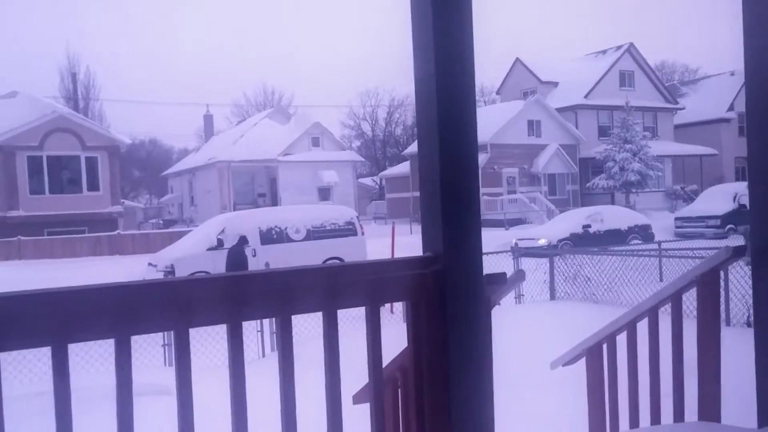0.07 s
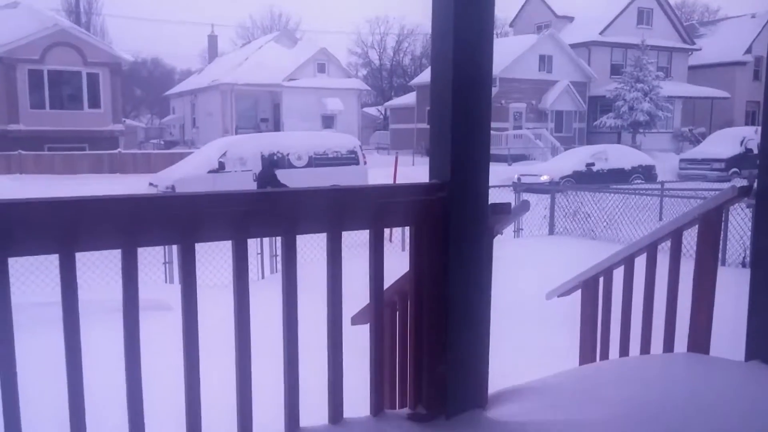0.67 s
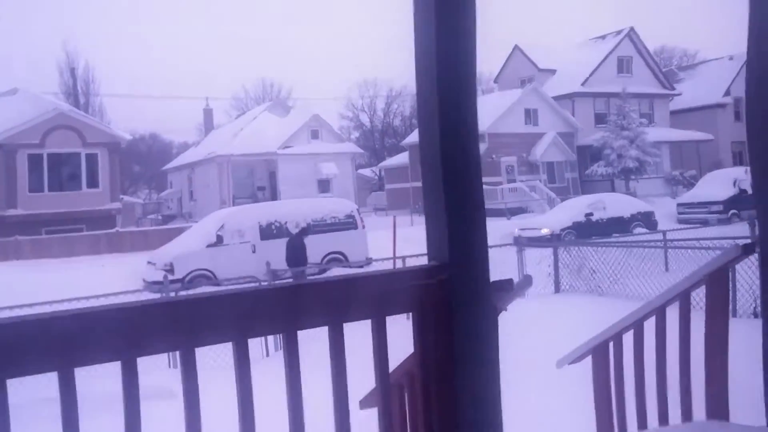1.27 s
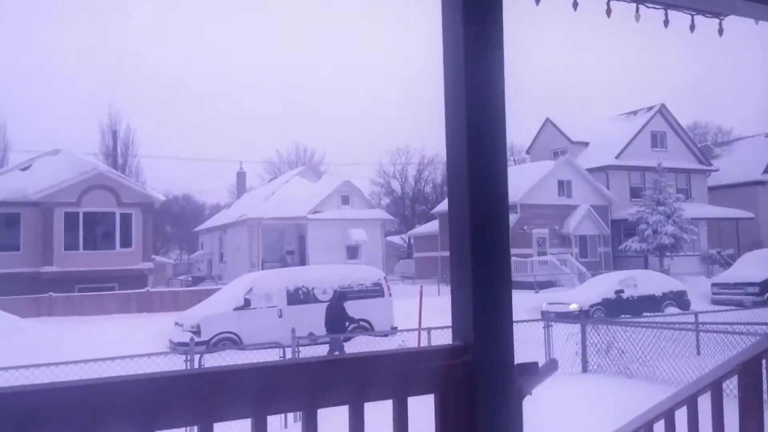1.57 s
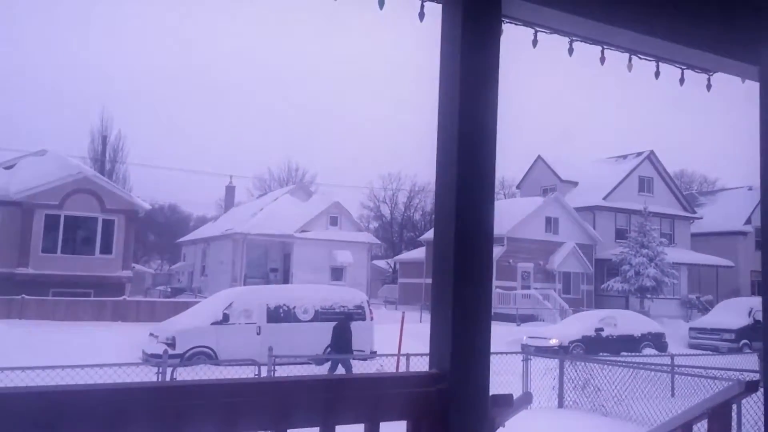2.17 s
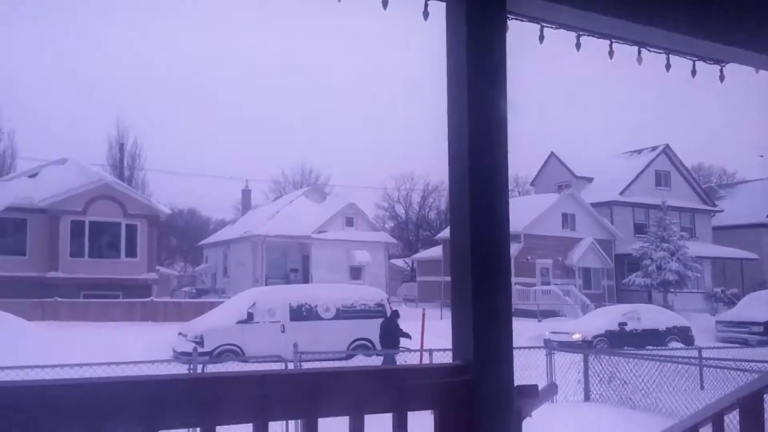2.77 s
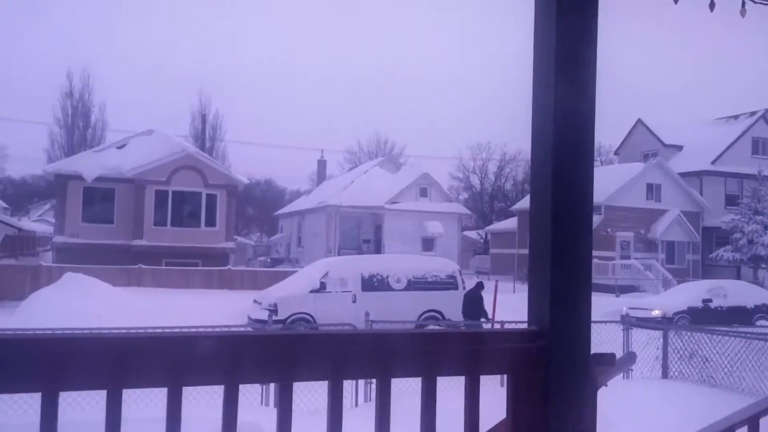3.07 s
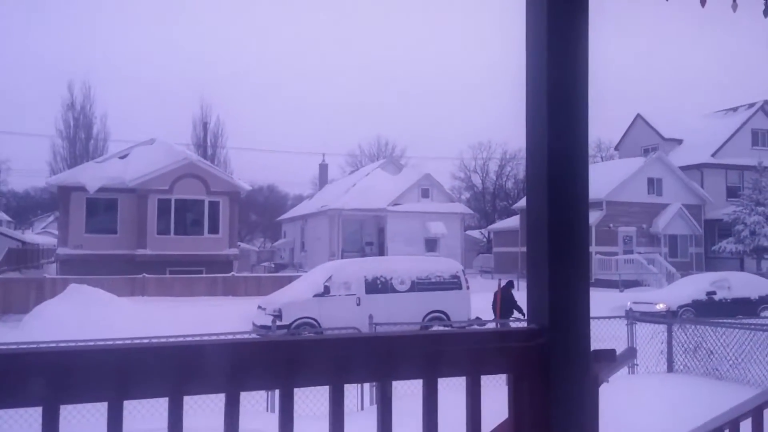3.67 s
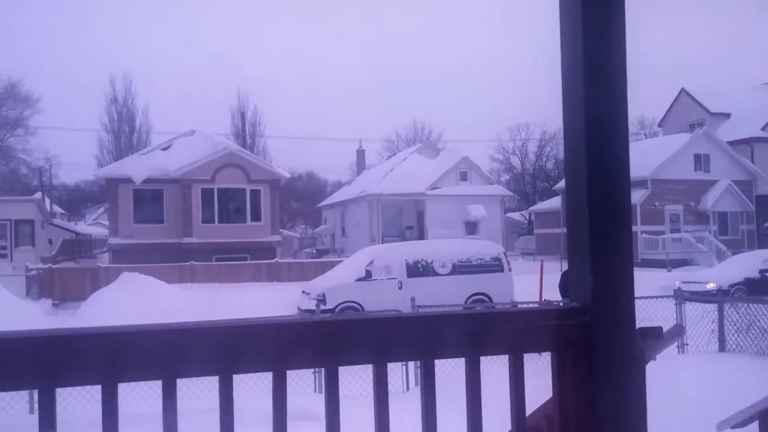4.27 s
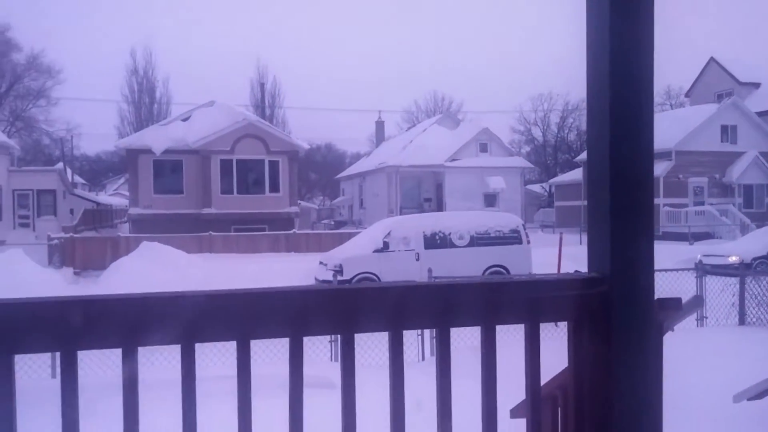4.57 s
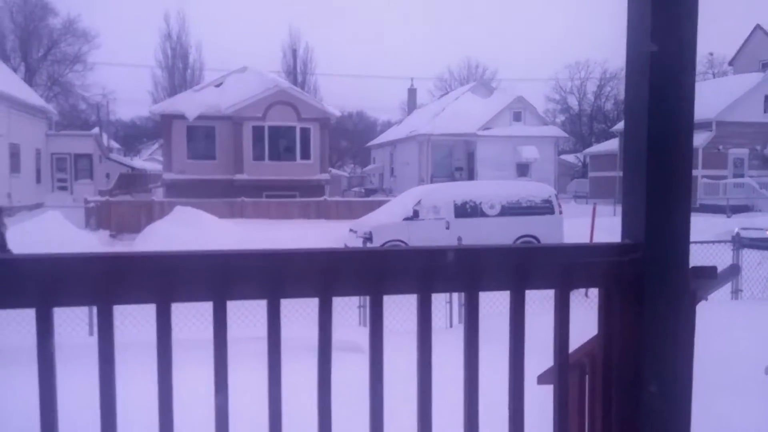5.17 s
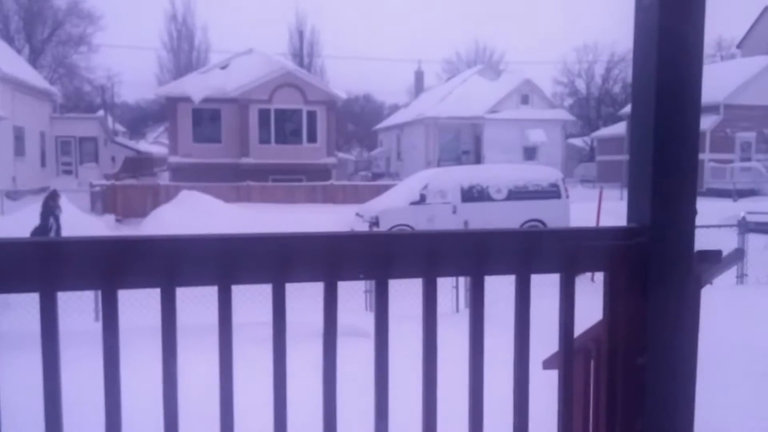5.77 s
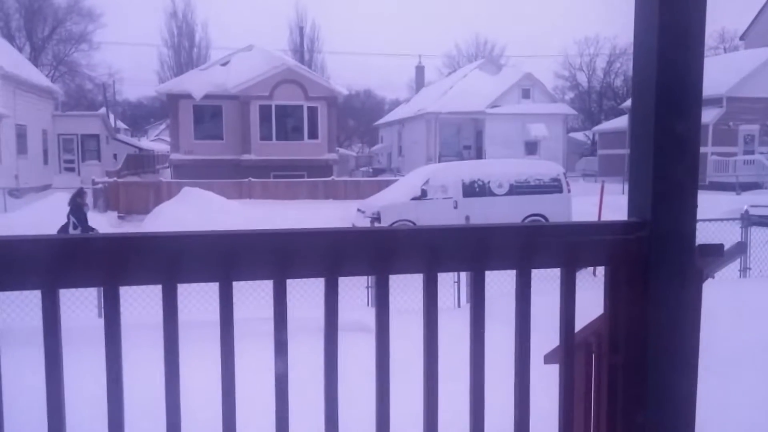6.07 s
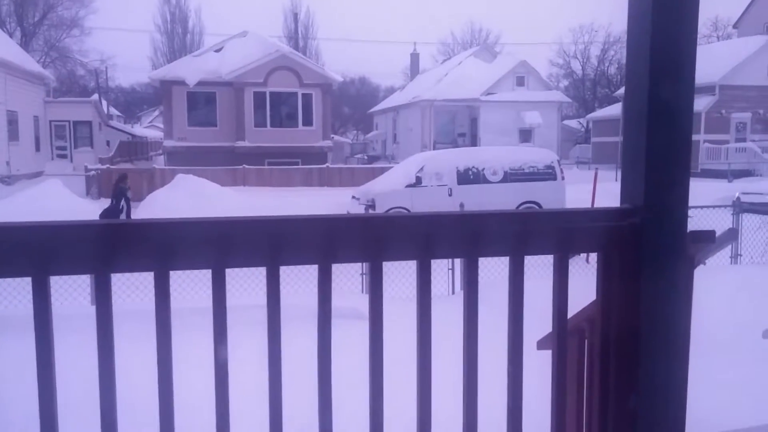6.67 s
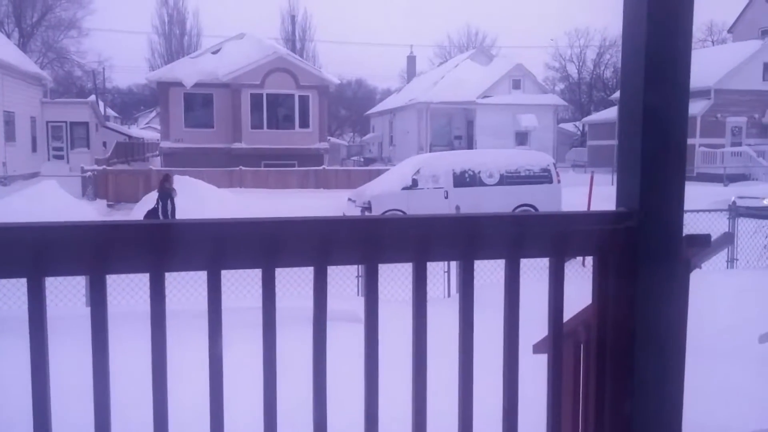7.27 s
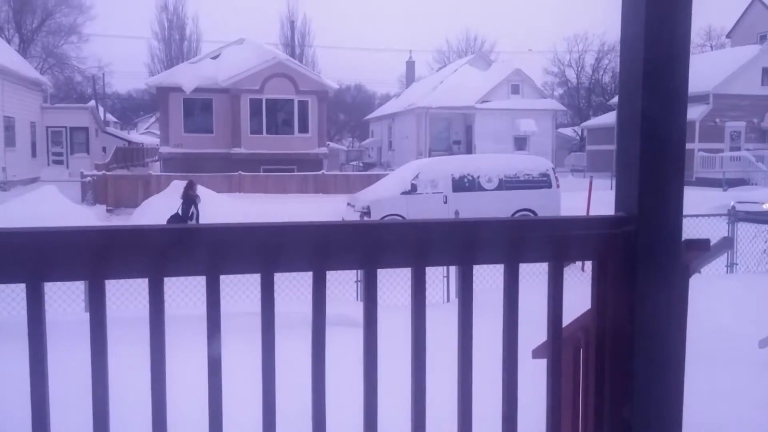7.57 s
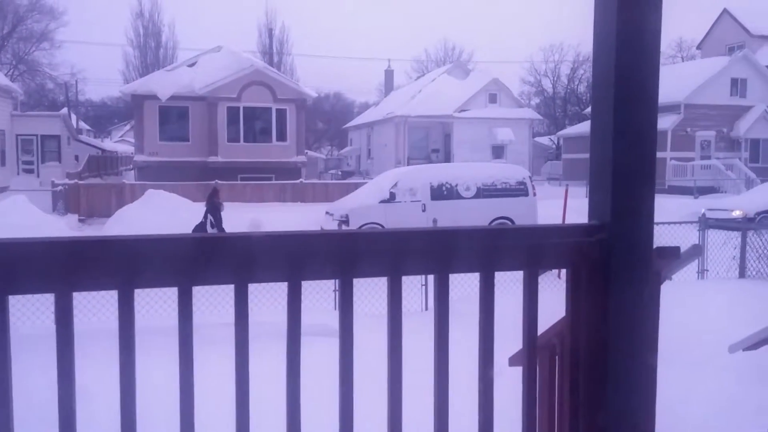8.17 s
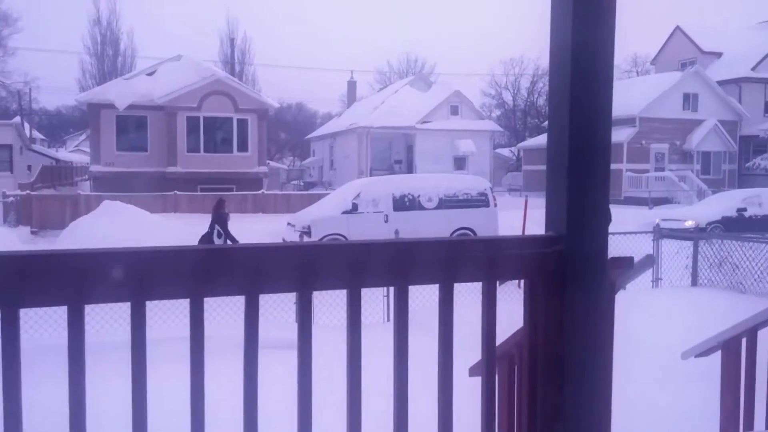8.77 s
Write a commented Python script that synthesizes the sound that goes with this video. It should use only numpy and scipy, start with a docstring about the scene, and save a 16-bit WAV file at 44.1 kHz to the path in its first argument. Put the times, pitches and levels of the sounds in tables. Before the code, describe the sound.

Faint wavering wind whistles over a low rumble, with one sharp, close bump and scrape of a hand on the microphone.

```python
"""Wind whistles through a narrow gap over a low rumble: a snowy street, from a porch, on a hand-held camera.
The whistle turns higher and hissier in the gusts, and the two strongest add a hollow hoot.
Right at the microphone a hand bumps and scrapes the camera, whose gain control then ducks
for a few seconds. Later, fingers tap the case."""
import sys
import numpy as np
from scipy import signal
from scipy.fft import irfft, next_fast_len
from scipy.io import wavfile

SR = 44100
rng = np.random.default_rng(int(sys.argv[2]) if len(sys.argv) > 2 else 0)


def store_wav(level_fs):
    """Save 16-bit WAV to argv[1]."""
    pcm = np.round(np.clip(np.atleast_2d(level_fs), -1, 1) * 32767)
    wavfile.write(sys.argv[1], SR, pcm.T.astype(np.int16))


N = 389403
T = np.arange(N) / SR


def whistle(gap_hz=3550, spacing_hz=700, lock=0.42, hiss_db=-7.0, hiss_width_hz=450, gain_db=-0.73):
    """An edge tone: eddies shake the jet, which clings to one resonance of the gap, then jumps on."""
    # how loudly the gap answers each pitch of the jet: pitch_hz, level_db
    gap_response = [(2200, -77), (2550, -74.5), (2850, -82.5), (3050, -79), (3200, -72), (3400, -68),
                    (3600, -67), (3850, -64.5), (4100, -70), (4450, -70.5), (4950, -74), (5400, -70),
                    (5900, -67.5)]
    waver_hz, flutter_hz = 95, 130
    saturation_db, break_db = 2, 7
    aim_hz = jet()
    jet_hz = aim_hz + waver_hz * aim_hz / gap_hz * walk(55)  # a faster jet is shaken harder
    level_db = np.interp(jet_hz, *np.transpose(gap_response))
    detune = 2 * np.pi * (jet_hz - gap_hz) / spacing_hz
    pull_hz = lock * np.sin(detune) * spacing_hz / (2 * np.pi)
    pitch_hz = jet_hz - pull_hz + flutter_hz * walk(240)
    phase = 2 * np.pi * np.cumsum(pitch_hz) / SR
    # the tone saturates when the jet is on the edge, and breaks up when an eddy knocks it off
    miss = np.maximum(walk(45), 0)
    tone = unit(np.sin(phase) * undb(saturation_db * np.cos(detune) - break_db * miss))
    # a faster jet is more turbulent and wraps the tone in a band of hiss
    hiss = walk(hiss_width_hz) * np.sin(phase) + walk(hiss_width_hz) * np.cos(phase)
    return unit(tone + hiss * undb(hiss_db) * aim_hz / gap_hz) * undb(level_db + gain_db)


def jet(catch_s=0.027):
    """Pitch of the air jet in Hz: it idles low, and each spell or chirp lifts it to where the gap sings."""
    # the weak jet between spells: time_s, pitch_hz
    lull = [(2.0, 2850), (6.75, 2499), (7.8, 2520), (7.95, 3020), (8.8, 2980)]
    # spells of whistling, one curve each: time_s, pitch_hz
    spells = [
        [(0.03, 3500), (0.082, 4430), (0.132, 4080), (0.148, 5274), (0.356, 4550), (0.404, 3676), (0.574, 4404),
         (0.588, 5208), (0.61, 4299), (0.806, 4512), (0.858, 3676), (0.902, 4922), (0.908, 4151), (0.956, 4779),
         (1.022, 3314), (1.15, 3580)],
        [(1.42, 3524), (1.44, 4315), (1.484, 3707), (1.584, 3508), (1.61, 4563), (1.652, 3626), (1.87, 3367),
         (1.938, 3780), (1.96, 3252)],
        [(2.63, 3272), (2.668, 3690), (2.762, 3530), (2.78, 4245), (2.824, 4957), (2.98, 4980), (3.014, 3845),
         (3.084, 3834), (3.102, 4813), (3.318, 3494), (3.344, 3102), (3.44, 3501)],
        [(3.49, 3380), (3.77, 3496), (3.82, 3325), (3.83, 4064), (3.96, 3378), (4.03, 4708), (4.09, 3432),
         (4.13, 4650), (4.21, 4477), (4.22, 5372), (4.24, 3940), (4.29, 6071), (4.53, 4595), (4.55, 3770),
         (4.57, 5153), (4.59, 4020), (4.68, 4809), (4.86, 4165), (4.88, 3335), (4.9, 4128), (5.03, 4666),
         (5.1, 4142), (5.2, 5676), (5.22, 4393), (5.32, 4575), (5.39, 3616), (5.4, 4537), (5.44, 3724),
         (5.65, 3235), (5.77, 3521), (5.79, 4354), (5.82, 3245)],
        [(5.86, 3635), (5.938, 3300), (5.974, 4074), (6.026, 3553), (6.09, 4419), (6.172, 3672), (6.574, 3239),
         (6.58, 3486), (6.74, 3178)],
    ]
    # lone chirps as the wind dies down: centre_s, top_hz, half_length_s
    chirps = [(7.281, 3252, .035), (7.46, 3497, .022), (7.66, 3500, .065), (7.9, 3392, .02),
              (8.04, 3347, .02)]
    hz = curve(lull)
    for spell in spells:
        start_s, end_s = spell[0][0], spell[-1][0]
        caught = np.clip(1 + np.minimum(T - start_s, end_s - T) / catch_s, 0, 1)
        hz = hz + caught * (curve(spell) - hz)
    for s, top_hz, half_s in chirps:
        hz = hz + swell(s, half_s) * (top_hz - hz)
    return hz


def hoots():
    """The strongest gusts also blow across a wider opening, which answers with an airy, hollow note."""
    # hooting gusts: centre_s, level_db, half_length_s
    gusts = [(3.12, -68, 0.2), (4.3, -69, 0.17)]
    # resonances of the opening: pitch_hz, width_hz, level_db
    hollow = [(1488, 90, 1), (2050, 426, -10.5)]
    envelope = sum(undb(db) * swell(s, half_s) for s, db, half_s in gusts)
    return shaped(lambda f: resonant(f, hollow)) * envelope


def knocks(tick_db=-7.5, sheen_db=-27, sheen_hz=12200, crisp_hz=3000, rise_s=.002):
    """Each blow runs through the camera case as a falling chirp and leaves its modes ringing."""
    # the bump, then finger taps: start_s, level_db, contact_hz, damped_below_hz
    blows = [(1.3052, 4.5, 15000, 7), (1.3177, 8.5, 1669, 652), (3.978, -35, 800, 560),
             (7.524, -38.5, 803, 550.5), (7.993, -36, 800, 510), (8.069, -31.5, 776, 510)]
    # modes of the case: pitch_hz, level_db, t60_s
    case_modes = [(360, -10.5, 0.048), (386, -4, .065), (623, -1.53, .021), (672.8, -2.5, .032),
                  (1072, -14, .04), (1500, -5, .008)]
    fall_hz, end_hz, sweep_s, tick_s = 8700, 790, .00049, .00077
    t = np.arange(SR // 5) / SR
    sweep_hz = end_hz + fall_hz * np.exp(-t / sweep_s)
    chirp = np.sin(2 * np.pi * np.cumsum(sweep_hz) / SR)
    sheen = undb(sheen_db) * np.sin(2 * np.pi * sheen_hz * t)
    tick = (chirp + sheen) * (t / tick_s) ** 2 * np.exp(2 - 2 * t / tick_s)
    attack = 1 - np.exp(-(t / rise_s) ** 2)
    out = np.zeros(N)
    for s, db, contact_hz, damped_below_hz in blows:
        # a soft finger excites little above contact_hz; the gripping hand damps the low modes
        ring = 0
        for hz, mode_db, t60_s in case_modes:
            decay_db = 60 * t / t60_s * (1 + (damped_below_hz / hz) ** 2)
            ring += rolloff(hz, contact_hz) * undb(mode_db - decay_db) * np.sin(2 * np.pi * hz * t)
        blow = ring * attack + tick * undb(tick_db) * rolloff(crisp_hz, contact_hz)
        start = int(s * SR)
        out[start:start + len(t)] += undb(db) * blow
    return out


def scrape(grain_db=2.5, dull_hz=2900, hard_db=-36):
    """Skin sticks and slips on the plastic by the microphone, ringing its resonances over a dull push."""
    # strokes of the hand: centre_s, friction_db, pressure_db, half_length_s
    strokes = [(1.253, -49, -46.5, 0.005), (1.296, -47.5, -42, 0.0052), (1.332, -36, -32, .02),
               (1.369, -29.5, -34, .014), (1.4, -42, -37, .019)]
    # resonances of the rubbed case: pitch_hz, width_hz, level_db
    plastic = [(700, 180, -2), (1060, 90, 0), (1420, 90, 3), (2099, 290, 2.5), (2700, 180, -9),
               (3660, 1100, -9), (4420, 610, -10), (5700, 540, -10), (12100, 650, -15)]
    # dull noise of the hand's pressure: frequency_hz, relative_db
    push_spectrum = [(25, -12), (80, 1), (150, -2), (300, -3), (550, -3), (900, -15), (2000, -40)]
    friction = sum(undb(db) * swell(s, half_s) for s, db, _, half_s in strokes)
    pressure = sum(undb(db) * swell(s, half_s) for s, _, db, half_s in strokes)
    bright = np.minimum(friction / undb(hard_db), 1)  # only a hard rub brings out the treble
    hard = shaped(lambda f: resonant(f, plastic))
    light = shaped(lambda f: resonant(f, plastic) * rolloff(f, dull_hz))
    body = bright * hard + np.sqrt(1 - bright ** 2) * light
    grainy = unit(body * undb(grain_db * walk(250)))
    return grainy * friction + coloured(push_spectrum) * pressure


def flexes(jitter_s=.00028):
    """Slow pushes of the grip make the case give with a few dull, uneven cycles."""
    # a soft thud and two creaks: centre_s, peak_db, pitch_hz, half_length_s
    pushes = [(1.416, -33.5, 127, 0.011), (7.9, -59, 670, .025), (8.417, -62.5, 670, .04)]
    jitter = jitter_s * walk(80)
    return sum(undb(db) * swell(s, half_s) * np.sin(2 * np.pi * hz * (T - s + jitter))
               for s, db, hz, half_s in pushes)


def wind(rumble_db=-53.5, rush_db=-70.5, buffet_db=1.0, flicker_db=0.6):
    """Out in the street, large eddies rumble round the houses; small ones make a soft rush."""
    # low rumble: frequency_hz, relative_db
    rumble_spectrum = [(20, -31), (33, -26), (50, -4.5), (64, -3.5), (78, 1), (105, -4), (135, -9),
                       (153, 0.5), (185, 0), (255, -10.5), (380, -14.5), (600, -22.5), (800, -24.5),
                       (1200, -43.5)]
    # rush of air: frequency_hz, relative_db
    rush_spectrum = [(300, -6), (900, 0.5), (1300, 0), (2100, 0), (3000, -5), (4500, -8.5), (6500, -12.5),
                     (9000, -20.5), (15000, -31)]
    # the wind slackens for a moment: centre_s, gain_db, half_length_s
    slack = (2.4, -2.3, 0.55)
    s, db, half_s = slack
    rumble = coloured(rumble_spectrum) * undb(rumble_db + buffet_db * walk(4.9))
    rush = coloured(rush_spectrum) * undb(rush_db + flicker_db * walk(8.3))
    return (rumble + rush) * undb(db * swell(s, half_s))


def electronics(hiss_db=-77.0):
    """The noise floor: even microphone hiss under a faint hum and the camera's thin whine."""
    # hum and whine: pitch_hz, rms_db
    partials = [(177.6, -67.5), (313, -72), (598, -82), (1205, -87.5), (7797, -91), (9190, -94),
                (14762, -76)]
    # microphone hiss: frequency_hz, relative_db
    hiss_spectrum = [(2000, -4), (8000, -2.5), (11000, -5.5), (13500, -5.5), (14700, 0), (15800, 0)]
    tones = sum(undb(db) * np.sqrt(2) * np.sin(2 * np.pi * (hz * T + rng.random()))
                for hz, db in partials)
    return tones + coloured(hiss_spectrum) * undb(hiss_db)


def undb(db):
    """Decibels to gain."""
    return 10 ** (np.asarray(db) / 20)


def unit(x):
    """Scale to rms 1."""
    return x / np.sqrt(np.mean(x ** 2))


def curve(points):
    """Straight lines through (time_s, value) points."""
    return np.interp(T, *np.transpose(points))


def swell(centre_s, half_s):
    """A smooth rise to 1 and fall around centre_s."""
    return np.exp(-((T - centre_s) / half_s) ** 2)


def rolloff(hz, corner_hz):
    """Gain of a steep low-pass."""
    return 1 / (1 + (hz / corner_hz) ** 4)


def resonant(f, peaks):
    """Gain of (pitch_hz, width_hz, level_db) resonances."""
    return np.sqrt(sum(undb(db) ** 2 / (1 + ((f - hz) / width) ** 2) ** 2 for hz, width, db in peaks))


def shaped(gain):
    """Noise of rms 1 whose spectrum follows gain(frequency_hz)."""
    size = next_fast_len(N, real=True)
    f = np.arange(1, size // 2 + 2) * SR / size
    white = rng.standard_normal(2 * len(f)).view(complex)
    return unit(irfft(gain(f) * white, size)[:N])


def coloured(points):
    """Noise of rms 1 with a spectrum through (frequency_hz, relative_db) points."""
    hz, db = np.transpose(points)
    return shaped(lambda f: undb(np.interp(np.log(f), np.log(hz), db)))


def walk(rate_hz):
    """A smooth random wander of rms 1, with little motion above rate_hz."""
    return shaped(lambda f: rolloff(f, rate_hz))


def scene():
    """Mono, from the porch: wind and whistle, with the hand's noises close on top."""
    # the background swells briefly after the bump: time_s, gain_db
    lift = [(1.36, 2.5), (1.42, 11), (1.55, 6.5), (1.672, 4.5), (1.682, 1.5)]
    background = (wind() + whistle() + hoots() + electronics()) * undb(curve(lift))
    return (background + knocks() + scrape() + flexes())[None]


def gain_control(x, overload=.4, lag_s=.372, duck_db=6.0, hold_s=1.94, release_s=1.42):
    """An overload turns the gain down after a lag; it holds, then creeps back."""
    hit = np.abs(x).max(axis=0) > overload
    since_hit_s = T - np.maximum.accumulate(np.where(hit, T, -np.inf))
    duck = np.clip(1 - (since_hit_s - hold_s) / release_s, 0, 1)
    return x * undb(-duck_db * np.interp(T - lag_s, T, duck))


def record(dry):
    """The camera's sound path: slow gain control, rounded peaks and a steep top cut."""
    ceiling, top_hz = .85, 15850
    rounded = ceiling * np.tanh(gain_control(dry) / ceiling)
    top_cut = signal.ellip(10, .2, 70, top_hz, fs=SR, output="sos")
    return signal.sosfilt(top_cut, rounded)


dry = scene()
out = record(dry)
store_wav(out)
```